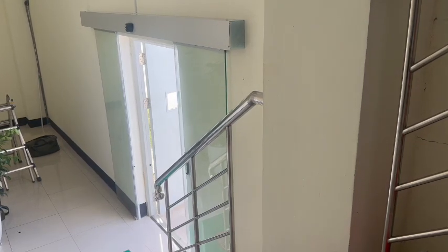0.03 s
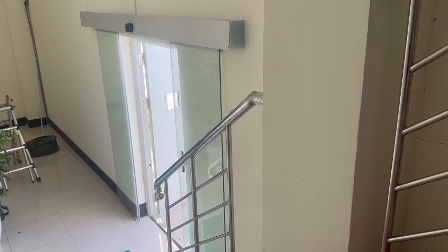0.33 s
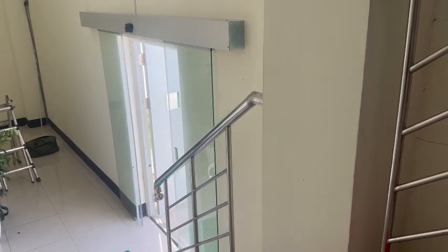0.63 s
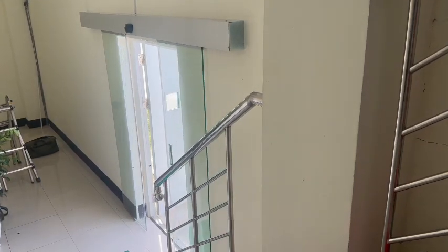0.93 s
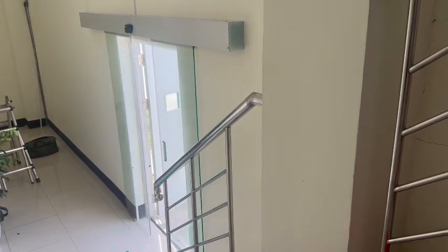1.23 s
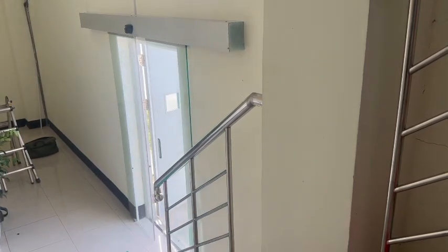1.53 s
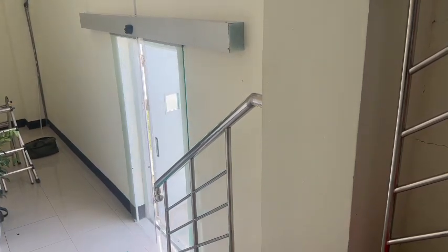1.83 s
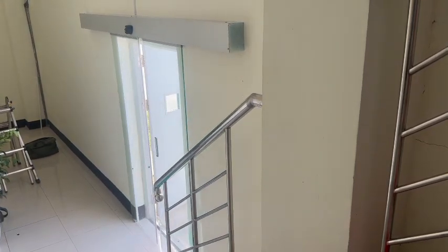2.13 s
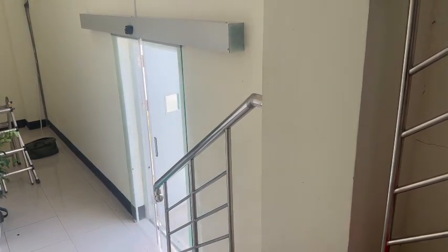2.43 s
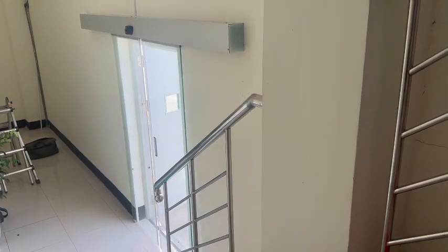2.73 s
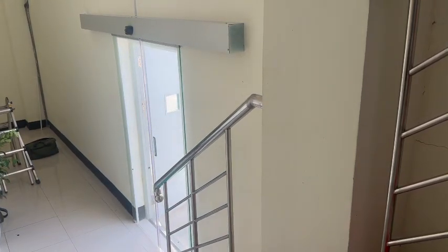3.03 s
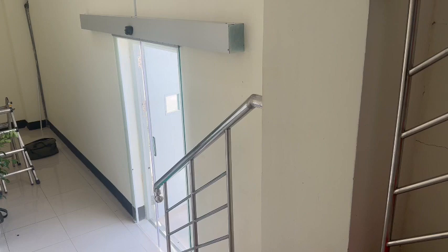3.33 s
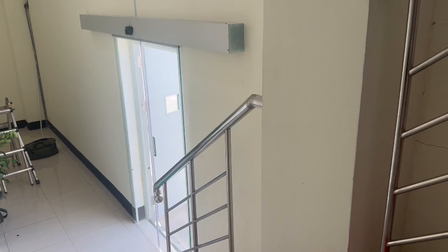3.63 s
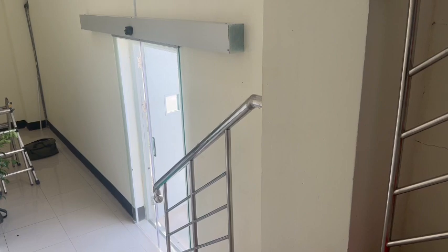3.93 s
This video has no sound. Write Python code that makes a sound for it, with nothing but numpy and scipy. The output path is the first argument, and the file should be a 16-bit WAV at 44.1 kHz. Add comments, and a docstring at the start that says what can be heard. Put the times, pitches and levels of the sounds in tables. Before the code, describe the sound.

An automatic glass door slides shut with a motor hum, rolling rumble and soft knock.

```python
"""A geared motor hums and rollers rumble as an automatic glass door slides shut in a tiled stairwell, a few
metres away. A bright hiss fades, the drive engages with a clack and a click, and the belt hisses on its
pulleys. The carriage rattles softly, squeals faintly and thuds over a rough patch of rail. The door brakes,
creeps and meets the frame with a soft knock, a scuff of the seal and a few ticks. Under it all lies the
building's low, steady rumble with faint electrical whines."""
import sys
import numpy as np
from scipy import signal
from scipy.fft import rfft, irfft
from scipy.io import wavfile
from scipy.ndimage import uniform_filter1d

SR = 44100
rng = np.random.default_rng(int(sys.argv[2]) if len(sys.argv) > 2 else 0)


def output_pcm(signal):
    """Save a mono or channel-first signal as 16-bit PCM at the path in sys.argv[1].

    Samples are clipped to [-1, 1] before scaling.
    """
    pcm = np.clip(np.atleast_2d(signal).T, -1, 1) * 32767
    wavfile.write(sys.argv[1], SR, np.round(pcm).astype(np.int16))


N = 176400

# the door's rolling on its rail, for rollers and rattle: t/s, level/dB
ROLL_LEVEL = [(0, -56), (.3, -53.5), (.55, -52), (.88, -50.5), (.96, -50), (1.05, -50.5), (1.25, -50.5),
              (1.52, -52), (1.7, -56.5), (2.0, -63), (2.6, -63), (3.2, -87), (4, -80)]


def undb(db):
    """Decibels to gain."""
    return 10 ** (np.asarray(db) / 20)


def unit(x):
    """Scale to rms 1."""
    return x / np.sqrt(np.mean(x ** 2))


def noise():
    """White noise as mid and side."""
    return rng.standard_normal((2, N))


def curve(rows):
    """Join the rows by straight lines in time; one curve per column."""
    times, *columns = np.array(rows, float).T
    return [np.interp(np.arange(N) / SR, times, column) for column in columns]


def gains(points):
    """EQ curve through points of f/Hz, gain/dB."""
    hz, db = np.array(points, float).T
    bins_hz = np.maximum(np.fft.rfftfreq(N, 1 / SR), 1)
    return undb(np.interp(np.log(bins_hz), np.log(hz), db))


def colour(x, points):
    """Run x through the EQ curve of the points."""
    return irfft(rfft(x) * gains(points), N)


def resonance(x, hz, width_hz):
    """Two-pole band-pass."""
    return signal.lfilter(*signal.iirpeak(hz, hz / min(width_hz, SR / 4), fs=SR), x)


def mode(force, hz, t60):
    """One ringing mode that dies by 60 dB in t60 seconds."""
    return resonance(force, hz, np.log(1000) / (np.pi * t60))


def lowpass(x, hz, order):
    """Butterworth treble roll-off."""
    return signal.sosfilt(signal.butter(order, hz, fs=SR, output="sos"), x)


def noise_band(hz, stage_width_hz):
    """Noise through two like resonances, at rms 1."""
    return unit(resonance(resonance(noise(), hz, stage_width_hz), hz, stage_width_hz))


def wander(rate_hz):
    """Smooth random drift of spread 1."""
    smoothing = np.exp(-(np.fft.rfftfreq(N, 1 / SR) / rate_hz) ** 2)
    return unit(irfft(rfft(rng.standard_normal(N)) * smoothing, N))


def tone(hz, rough, waver_hz):
    """A tone whose strength and phase waver, as mid and side."""
    carrier = np.exp(2j * np.pi * (np.cumsum(hz * np.ones(N)) / SR + rng.random()))
    waver = lambda: (wander(waver_hz) + 1j * wander(waver_hz)) / np.sqrt(2)
    mid = carrier * (1 + rough * waver())
    side = carrier * waver()
    return np.array([unit(mid.real), unit(side.real)])


def blows(t, rows, attack_s, decay_s):
    """Envelope of cushioned contacts from rows of t/s, level/dB."""
    ages = [(np.maximum(t - start, 0), db) for start, db in rows]
    return sum(undb(db) * (1 - np.exp(-age / attack_s)) * np.exp(-age / decay_s) for age, db in ages)


def stairwell(x, wet_db):
    """Direct sound plus the stairwell's tail, whose treble rings a little longer; mid and side."""
    low_t60_s, treble_t60_s = 0.75, 0.99
    t = np.arange(SR) / SR
    wash = rng.standard_normal((2, SR))
    low = lowpass(wash, 2500, order=2)
    tail = low * undb(-60 * t / low_t60_s) + (wash - low) * undb(-60 * t / treble_t60_s)
    tail = lowpass(tail, 7740, order=4)
    tail /= np.sqrt(np.sum(tail ** 2) / 2)
    return x + undb(wet_db) * signal.fftconvolve(x[:1], tail, axes=1)[:, :N]


def room_tone():
    """Low rumble and air of the building, with thin, steady electrical whines."""
    # spectrum of the building's air: f/Hz, gain/dB
    air_eq = [(12, -44.5), (26, -25), (44, -1), (62, 1), (82, 1), (100, -2), (125, -3.5), (145, -10),
              (200, -17.5), (260, -18), (310, -26), (380, -24), (480, -27), (650, -29), (950, -30.5),
              (1400, -35), (1900, -39), (2600, -41), (3300, -47), (4300, -52), (5300, -54), (6200, -52),
              (7200, -52), (7700, -60), (8200, -56.5), (8900, -63.5), (9400, -60.5), (10500, -91.5),
              (13500, -63), (16000, -77.5)]
    # electrical whines: f/Hz, level/dB
    whines = [(2741, -86), (3235, -89.5), (4624, -93), (5636, -97), (6126, -95), (8172, -105),
              (9247, -102.5), (13867, -107)]
    air = unit(colour(noise(), air_eq)) * undb(-44 + 0.71 * wander(3.8))
    return air + sum(undb(db) * tone(hz, rough=0.42, waver_hz=22.2) for hz, db in whines)


def motor(t):
    """Harmonics of the shaft swell in turn as the door travels; the fifth booms in the housing."""
    # motor drive: t/s, shaft speed/Hz, hum level/dB
    drive = [(0, 22.78, -57.5), (.14, 23.63, -55.5), (.22, 24.28, -47), (.31, 23.8, -44), (.38, 24.05, -55),
             (.58, 23.99, -58.5), (.68, 24.28, -47.5), (.98, 23.93, -50), (1.12, 23.91, -52.5),
             (1.22, 23.74, -69), (1.55, 23.4, -65), (1.82, 23.1, -55), (1.96, 22.66, -58),
             (2.1, 22.6, -74.5), (2.8, 22.78, -69.5), (2.95, 22.63, -63), (3.3, 22.37, -65),
             (4, 22.43, -66.5)]
    # hum mix: multiple of the shaft speed, weight/dB, swell middle/s, swell half-width/s, swell/dB
    harmonics = [(7, -13.5, 1.06, 0.31, 9.5), (10, -13, .82, 0.3, 9), (12, -13.5, 0.12, 0.12, 14.5),
                 (14, -7.5, 2, 0.17, 1.5), (15, -8.5, 1.2, 0.13, 6.5), (16, -3.5, 0.27, 0.091, 0.5),
                 (18, -15, 1.4, 0.5, 22.5)]
    # boom of the housing: t/s, level/dB
    boom_level = [(0, -57.5), (.55, -55), (.9, -52), (1.07, -41.5), (1.23, -57), (1.38, -48), (1.55, -55.5),
                  (1.8, -52.5), (2.0, -55), (4, -71.5)]
    shaft_hz, hum_db = curve(drive)
    shaft_hz = shaft_hz * (1 + .004 * wander(6.1))  # slight wow
    mix = np.array([undb(base + swell * np.exp(-((t - middle) / half_width) ** 2))
                    for _, base, middle, half_width, swell in harmonics])
    mix /= np.sqrt(np.sum(mix ** 2, axis=0))  # swells shift the timbre at constant power
    hum = sum(share * tone(round(multiple) * shaft_hz, rough=.65, waver_hz=14)
              for (multiple, *_), share in zip(harmonics, mix))
    boom = tone(5 * shaft_hz, rough=0.17, waver_hz=23.7)
    return hum * undb(hum_db) + boom * undb(curve(boom_level)[0])


def rollers():
    """Wheels run over the fine roughness and small bumps of the rail, throbbing as they turn."""
    # body of rail and housing: f/Hz, gain/dB
    rail_eq = [(40, -12), (70, -11), (115, -4.5), (190, 5), (270, -1.5), (330, 3), (450, 3), (640, -5.5),
               (780, -3.5), (880, -5.5), (980, -6.5), (1150, -8), (1600, -11.5), (2000, -18.5), (2700, -18),
               (3100, -26.5), (3600, -24.5), (4300, -32), (7000, -40.5), (10000, -52), (16000, -71)]
    bumps_per_s, wheel_hz = 240, 22.86
    bumps = (rng.random(N) < bumps_per_s / SR) * noise()
    contact = noise() + 0.22 * unit(bumps)
    wheel_angle = 2 * np.pi * np.cumsum(wheel_hz * (1 + 0.1232 * wander(3))) / SR
    throb = 1 + 0.12 * np.sin(wheel_angle)
    return unit(colour(contact, rail_eq)) * throb * undb(curve(ROLL_LEVEL)[0])


def rattle():
    """Uneven, cushioned jolts ring the rolling carriage, each with its own mix of modes."""
    # loose parts of the carriage: f/Hz, weight/dB, t60/s
    carriage_modes = [(540, 5, 0.024), (788, 1.5, 0.081), (959, 3, 0.068), (1166, -7, .05),
                      (1494, -5.5, 0.057), (1780, -6.5, 0.034), (2490, -10.5, 0.04)]
    jolts_per_s, spread_db, below_rollers_db = 70, 2, 11.5
    jolts = (rng.random(N) < jolts_per_s / SR) * undb(spread_db * rng.standard_normal(N))
    ring = sum(undb(db) * unit(mode(jolts * rng.uniform(-1.11, 1, (2, N)), hz, t60))
               for hz, db, t60 in carriage_modes)
    return unit(lowpass(ring, 2300, order=4)) * undb(curve(ROLL_LEVEL)[0] - below_rollers_db)


def opening_hiss(t):
    """A bright hiss, already sounding at the start, dies away quickly."""
    # spectrum of the opening hiss: f/Hz, gain/dB
    hiss_eq = [(1000, -17), (2600, 14.5), (3500, -6), (4700, 3), (8500, -1), (10500, -24), (16000, -27)]
    start_db, decay_s = -67.5, 0.18
    return unit(colour(noise(), hiss_eq)) * undb(start_db) * np.exp(-t / decay_s)


def belt():
    """The belt rubs on its pulleys with a narrow, unsteady hiss."""
    # belt hiss: t/s, level/dB
    hiss_level = [(0, -81), (.42, -81), (.62, -78.5), (.8, -74), (0.95, -75.5), (1.05, -74), (1.32, -74.5),
                  (1.55, -81.5), (2.1, -85.5), (3.2, -89), (4, -105)]
    hiss = noise_band(hz=5600, stage_width_hz=1160)
    return hiss * undb(curve(hiss_level)[0] + 1.2 * wander(25))


def clack(t):
    """The drive takes up its slack: one hard blow rings the coupling, with a little room."""
    # ringing of the coupling: f/Hz, starting level/dB, t60/s
    coupling_modes = [(780, -43.5, .022), (1300, -43, .016), (1750, -47.5, .01), (2500, -47, .008),
                      (3500, -53, .007)]
    start_s = .1385
    age = np.maximum(t - start_s, 0)
    ring = sum((-1) ** k * undb(db - 60 * age / t60) * np.sin(2 * np.pi * hz * age)
               for k, (hz, db, t60) in enumerate(coupling_modes))
    return stairwell(np.array([ring, np.zeros(N)]), wet_db=-9)


def clicks(t):
    """Ticks of the mechanism: a snap and a short noise burst, dull or bright, with a little room."""
    # ticks: t/s, dry peak/dB, low edge/Hz, high edge/Hz, decay/s
    ticks = [(0.1444, -47.5, 2100, 8200, 0.0026), (0.151, -55, 2000, 5990, 0.0055),
             (1.435, -67, 6000, 8300, .007), (1.626, -62, 2490, 8300, 0.0026),
             (3.319, -59.5, 998, 8000, 0.0036), (3.405, -57.5, 899, 5000, .005),
             (3.495, -68, 2000, 5000, .004), (3.552, -65, 2500, 7500, 0.0018)]
    track = np.zeros((2, N))
    for start, db, low_hz, high_hz, decay in ticks:
        burst = rng.standard_normal(N) * (t >= start) * np.exp(-np.maximum(t - start, 0) / decay)
        burst[int(start * SR)] += 4.2  # the snap
        band = signal.butter(3, [low_hz, high_hz], "bandpass", fs=SR, output="sos")
        tick = signal.sosfilt(band, burst)
        track[0] += undb(db) * tick / np.abs(tick).max()
    return stairwell(track, wet_db=-9)


def squeals(t):
    """Thin, rough tones swell and fade as the pulleys rub."""
    # pulley rubs: middle/s, length/s, f/Hz, level/dB, waver rate/Hz
    rubs = [(0.575, 0.24, 2765, -72.5, 22), (1.52, 0.18, 3550, -79, 150)]
    return sum(undb(db) * np.exp(-(2 * (t - middle) / length) ** 2) * tone(hz, rough=1, waver_hz=rate)
               for middle, length, hz, db, rate in rubs)


def thuds(t):
    """A roller hits a rough patch of the rail and shakes the housing."""
    # roller hits: t/s, level/dB
    hits = [(.9, -56), (0.956, -58)]
    return noise_band(hz=690, stage_width_hz=250) * blows(t, hits, attack_s=0.0023, decay_s=0.11)


def knock(t):
    """The door presses into its seal in a few cushioned contacts that ring glass and frame."""
    # door meeting the frame: t/s, level/dB
    contacts = [(3.297, -60), (3.318, -60), (3.399, -66.5)]
    # ringing of glass and frame: f/Hz, weight/dB, t60/s
    frame_modes = [(772, -3, 0.18), (1000, -2, 0.12), (1127, -2.5, 0.14), (1560, -10, 0.07),
                   (1816, -10, .08), (2290, -5.5, .06), (2550, -19, 0.08)]
    # body of glass and frame: f/Hz, gain/dB
    frame_eq = [(60, 0), (250, 5), (500, 0), (800, 9.5), (1150, 4), (1400, 2), (1900, 1), (2600, -1),
                (4000, -15), (6000, -13), (8800, -12.5), (10500, -23), (14000, -37), (17000, -47)]
    push = blows(t, contacts, attack_s=0.0034, decay_s=0.033)
    force = push * noise()
    ring = sum(undb(db) * mode(force, hz, t60) * np.sqrt(t60) for hz, db, t60 in frame_modes)
    loudest_rms = np.sqrt(uniform_filter1d(ring[0] ** 2, size=SR // 20).max())
    ring *= undb(-63.5) / loudest_rms
    body = push * unit(colour(noise(), frame_eq))
    return stairwell(body + ring, wet_db=-3)


def scuff(t):
    """The glass edge brushes its seal with a short, dry hiss."""
    # brushes against the seal: t/s, level/dB
    brushes = [(3.317, -74), (3.352, -78)]
    return noise_band(hz=8300, stage_width_hz=2800) * blows(t, brushes, attack_s=0.0017, decay_s=0.03)


def scene():
    """Mix all sources as mid and side, then spread them to left and right."""
    # stereo width: f/Hz, side gain/dB
    width_eq = [(30, -24), (50, -31.5), (110, -20.5), (200, -6.5), (400, -11), (620, -1), (1000, -3.5),
                (1500, 4.5), (1900, -3), (2400, -5.5), (3100, 0), (4000, -4.5), (6000, -2.5), (7400, 1),
                (8500, -1.5), (14000, -3.5)]
    # balance: f/Hz, left minus right/dB
    balance = [(150, 0), (380, 2), (690, -0.5), (1270, -2), (2340, -0.5), (4320, 3), (8000, 3),
               (14000, -0.5)]
    t = np.arange(N) / SR
    travel = motor(t) + rollers() + rattle() + thuds(t) + opening_hiss(t) + belt() + squeals(t)
    mid, side = travel + clack(t) + clicks(t) + knock(t) + scuff(t) + room_tone()
    side = colour(side, width_eq)
    lean = np.sqrt(gains(balance))
    left = irfft(rfft(mid + side) * lean, N)
    right = irfft(rfft(mid - side) / lean, N)
    return np.array([left, right])


def record(dry):
    """The treble dips in one narrow band and the top is cut."""
    # dip in the treble: f/Hz, gain/dB
    treble_dip = [(9600, -0.5), (10700, -15.5), (11800, -14.5), (12800, 2.5)]
    top_hz = 15200
    top_cut = signal.ellip(8, .2, 70, top_hz, fs=SR, output="sos")
    return signal.sosfilt(top_cut, colour(dry, treble_dip))


dry = scene()
out = record(dry)
output_pcm(out)
```